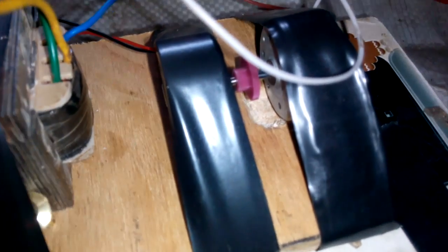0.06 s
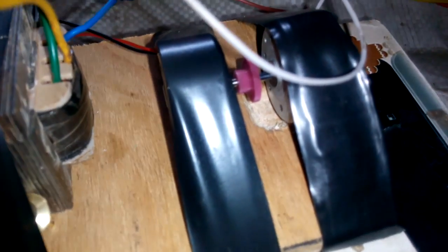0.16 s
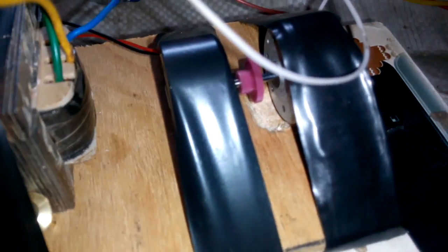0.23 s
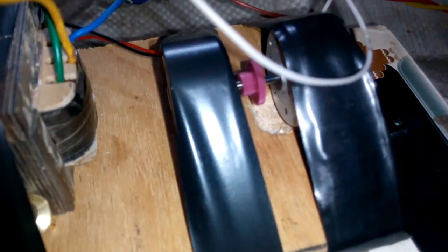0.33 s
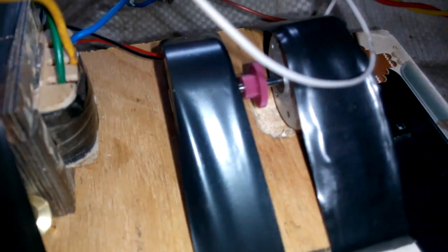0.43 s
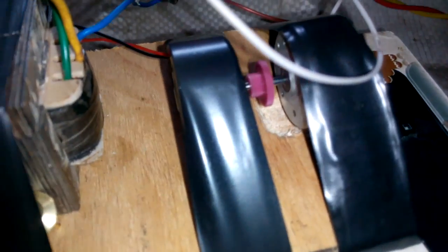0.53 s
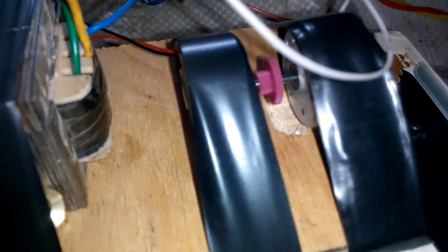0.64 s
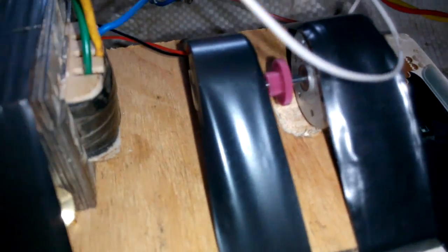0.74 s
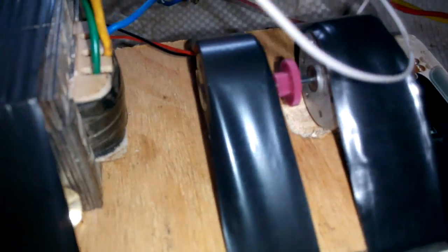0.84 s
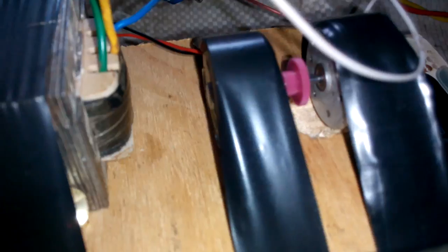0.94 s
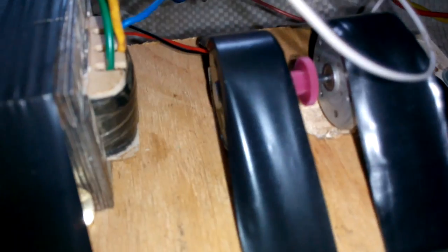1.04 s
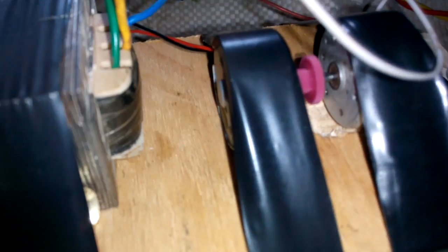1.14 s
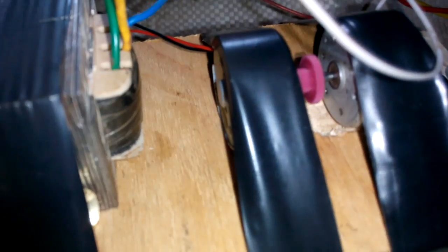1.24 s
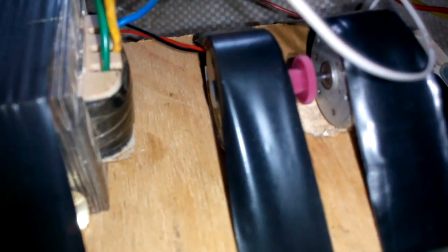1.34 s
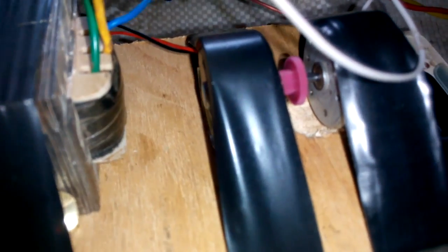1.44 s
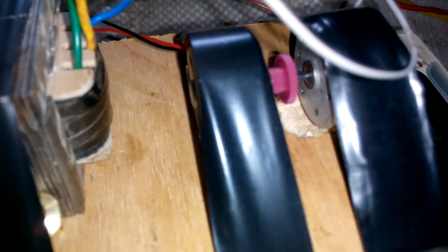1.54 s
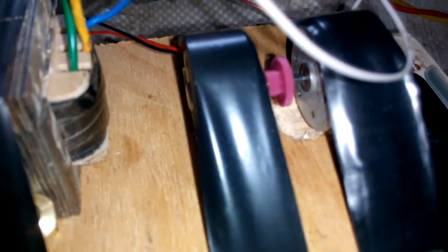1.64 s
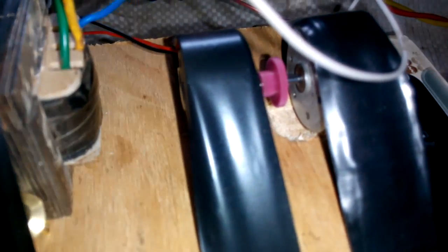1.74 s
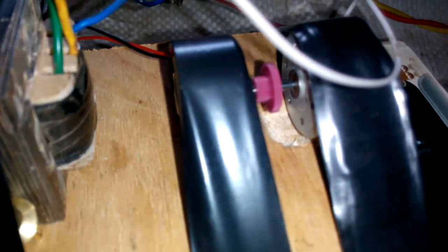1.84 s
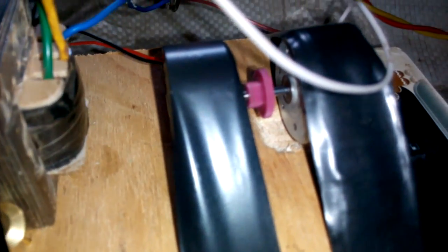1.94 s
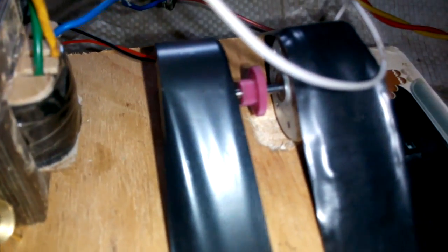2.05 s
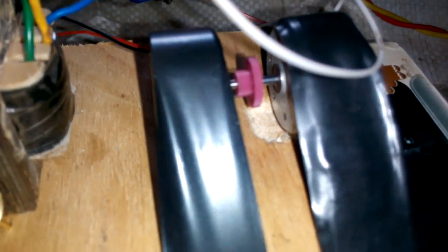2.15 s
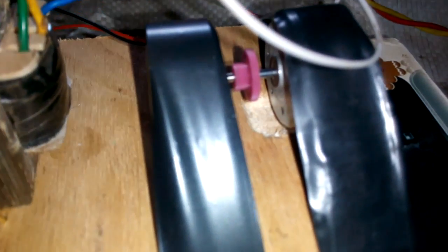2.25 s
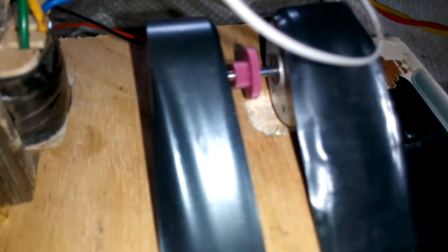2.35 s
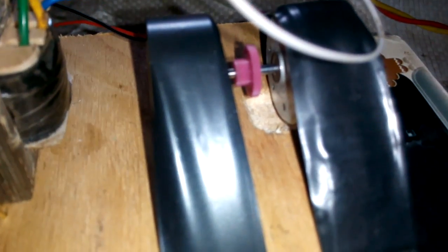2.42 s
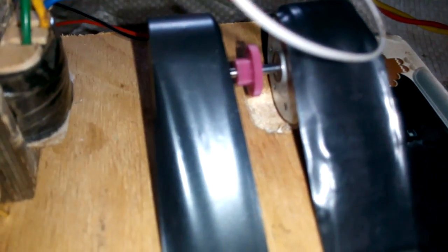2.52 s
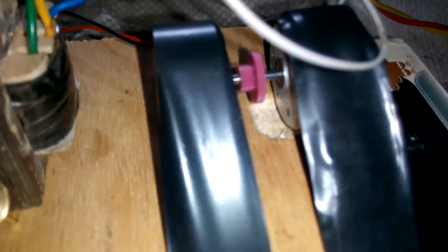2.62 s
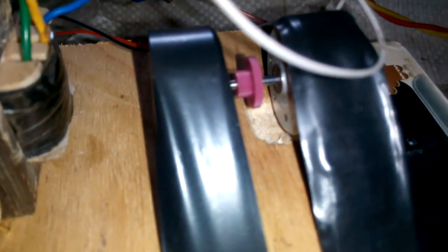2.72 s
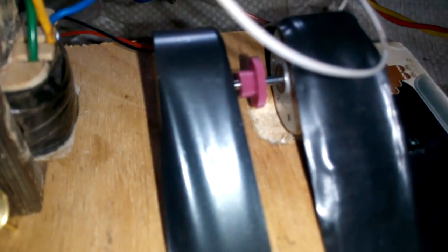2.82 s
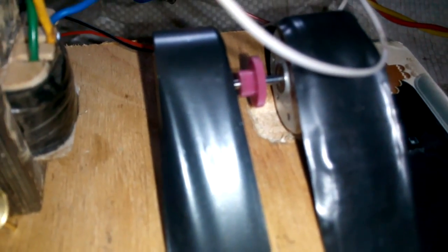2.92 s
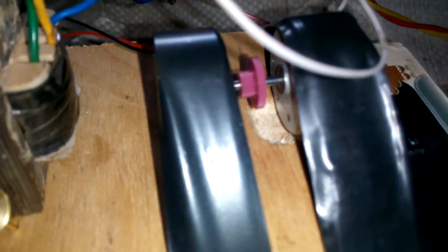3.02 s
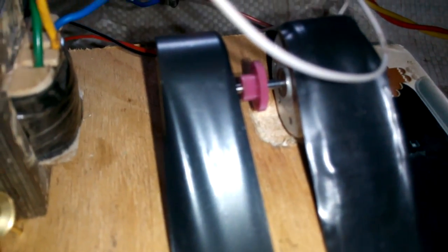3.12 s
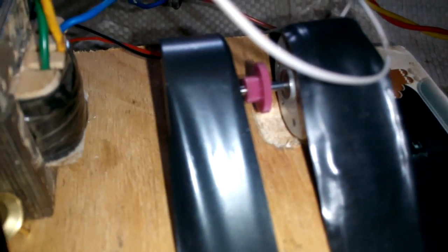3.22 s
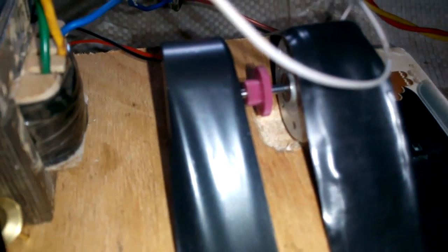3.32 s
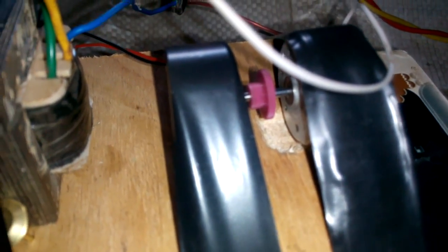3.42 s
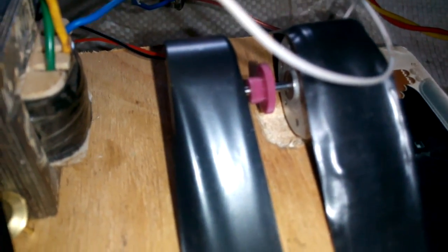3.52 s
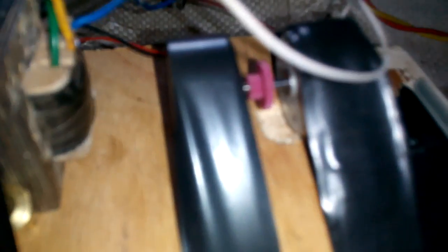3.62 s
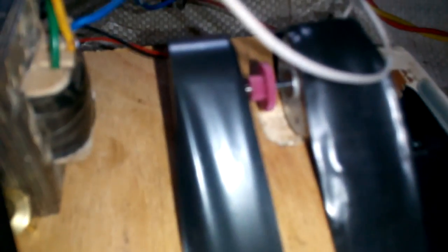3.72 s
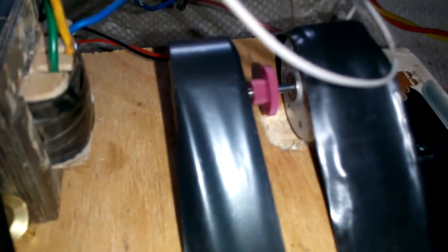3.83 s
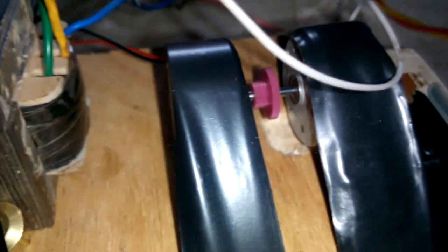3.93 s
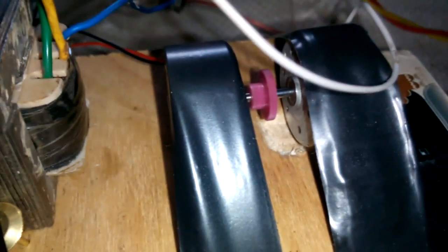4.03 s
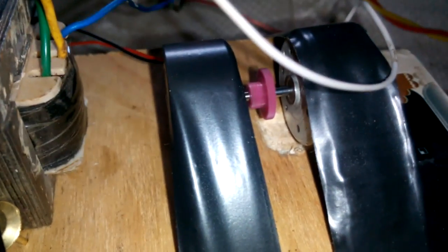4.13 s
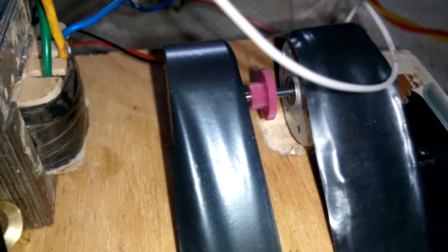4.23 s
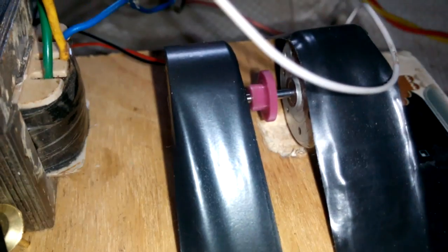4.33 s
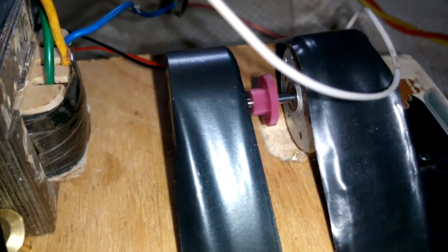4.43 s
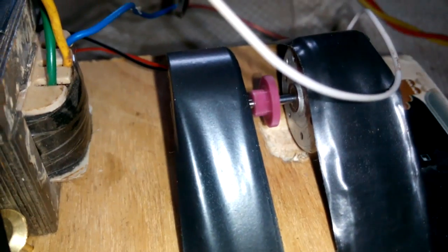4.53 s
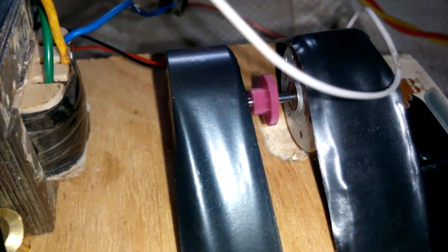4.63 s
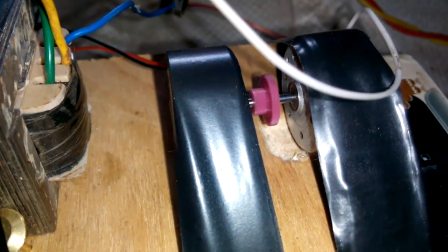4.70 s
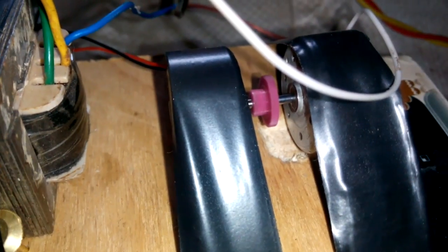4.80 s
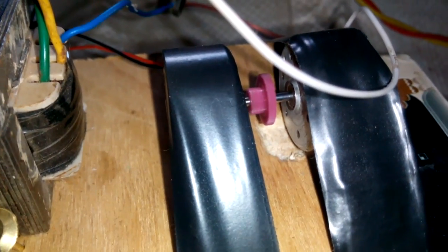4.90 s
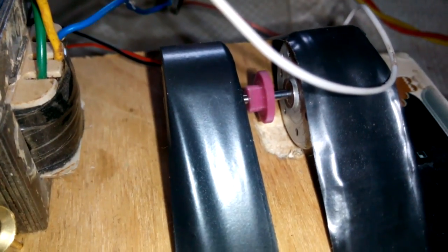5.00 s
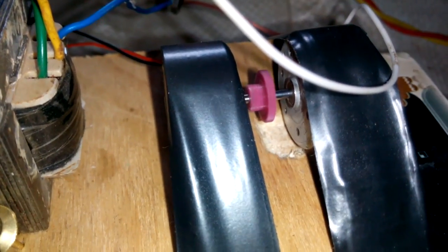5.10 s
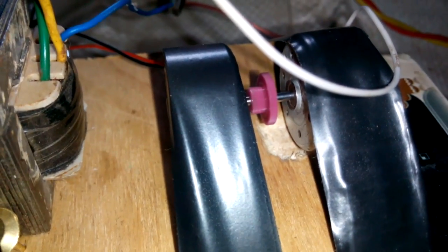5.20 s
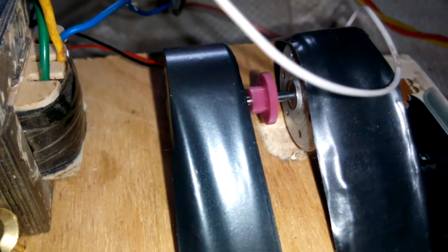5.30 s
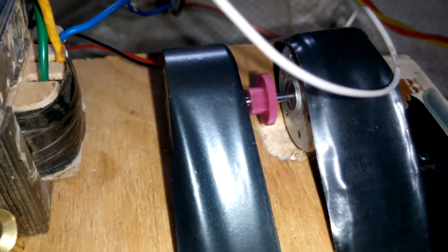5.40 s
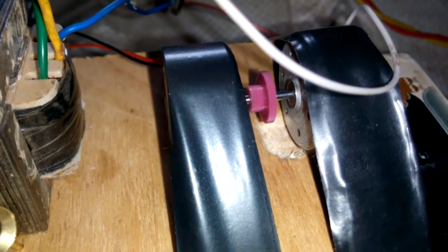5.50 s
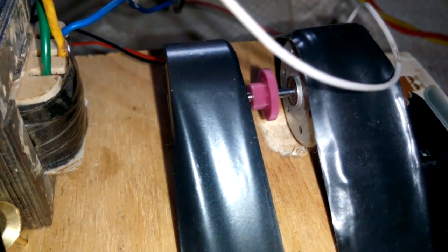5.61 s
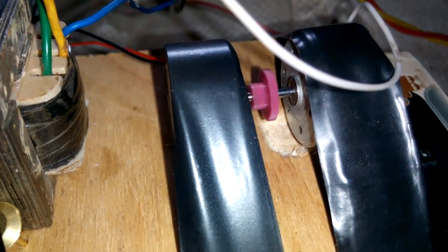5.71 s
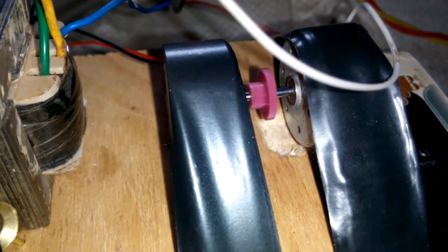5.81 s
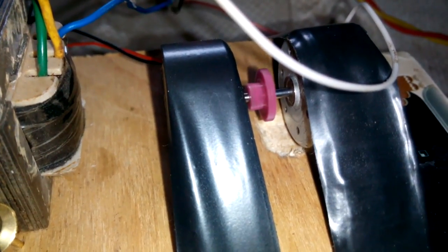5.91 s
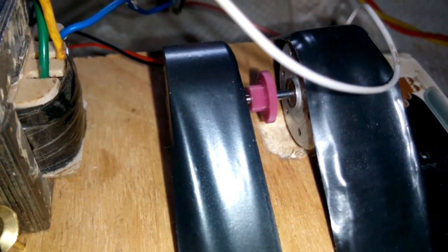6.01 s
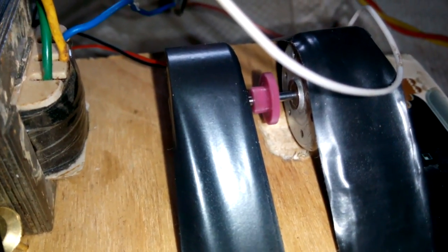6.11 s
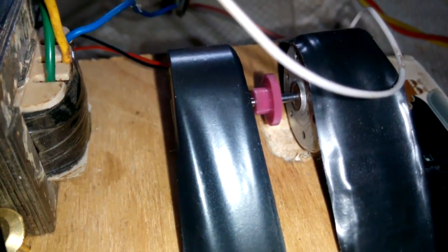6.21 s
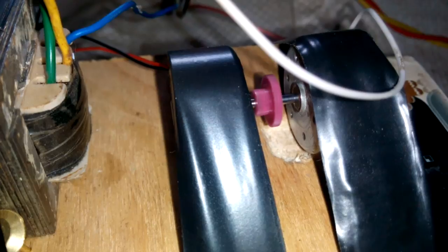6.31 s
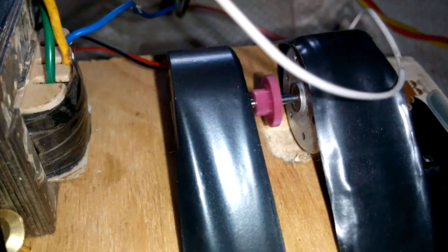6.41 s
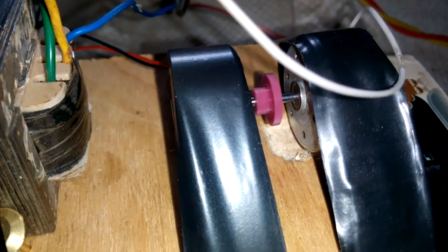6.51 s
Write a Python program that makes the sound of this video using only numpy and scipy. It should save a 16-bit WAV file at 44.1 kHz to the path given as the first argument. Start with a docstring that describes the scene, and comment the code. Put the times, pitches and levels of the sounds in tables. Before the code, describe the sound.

A steady motor whine on a wooden board glides downward, breaking into rattle, dry snaps and slow bearing ticks over faint hiss.

```python
"""On a plywood board in a quiet room, two small DC motors taped shaft to shaft whine and beat against each other.
The driven one slows to a crawl while the other coasts down, and the whine sinks into a rumble of the board.
Tones are sines locked to shaft angle; rumble, rattle and hiss are shaft-driven noise through resonances.
Ticks of loose bearings, snaps, clacks and knocks are impulses or bursts that ring; moans are short rising sines."""
import sys
import numpy as np
from scipy import signal
from scipy.fft import rfft, irfft, next_fast_len
from scipy.io import wavfile
from scipy.ndimage import uniform_filter1d

SR = 44100
rng = np.random.default_rng(int(sys.argv[2]) if len(sys.argv) > 2 else 0)


def generate_wav(sig):
    """Save sig (samples, or channels by samples) to the path in sys.argv[1] as 16-bit PCM at SR."""
    pcm = np.round(np.clip(np.atleast_2d(sig).T, -1, 1) * 32767).astype(np.int16)
    wavfile.write(sys.argv[1], SR, pcm)


N = 288899

# Speed of the driven and of the coasting motor: (time [s], speed [turns/s])
DRIVE = [(0, 120.74), (0.55, 120.0), (1, 120.35), (1.42, 118.03), (1.75, 112.12), (2, 103.73),
         (2.25, 90.39), (2.65, 64.57), (2.9, 52.18), (3.2, 42.49), (3.5, 35.21), (4, 28.61), (4.45, 24.04),
         (5.1, 22.94), (6, 20.03), (6.55, 19.04)]
COAST = [(0, 118.79), (1.1, 118.22), (1.65, 115.65), (2.1, 107.78), (2.7, 86.84), (3.25, 74.25),
         (3.6, 63.12), (4.1, 51.17), (4.6, 41.96), (5.3, 35.26), (6.55, 30.86)]
# Strong tones of torque ripple: (order of the driven shaft [1], multiple of the slip added [1],
# lag of the beat [turns of slip], relative level [dB])
WHINE = [(1, 0, 0, -26), (1, 1, 0.11, -5.5), (2, 0, 0, -18.5), (2, 2, -0.084, -29), (4, 0, 0, -26.5),
         (5, 1, .81, -38), (5, 3, 0, -48), (5, 5, .04, -49), (6, 0, 0, -25.5), (7, -1, -0.024, -42),
         (7, 1, -0.043, -40.5), (8, 0, 0, -42), (12, 0, 0, -40.5), (12, 2, .3, -42.5)]
# Weaker tones of imbalance and commutator: (order [1], relative level [dB])
BUZZ = [(3, -53), (9, -57), (10, -58), (11, -57), (13, -75), (14, -57.5), (15, -61), (16, -54), (17, -59.5),
        (18, -62), (19, -56), (20, -61), (21, -66), (24, -67), (25, -60), (26, -62.5), (28, -60),
        (29, -60.5), (32, -60), (33, -56.5), (34, -57), (36, -67), (38, -74), (42, -60), (44, -59),
        (46, -57.5), (48, -57.5)]
# High commutator whistles: (order [1], relative level [dB])
WHISTLES = [(44, -3), (46, -3), (48, -1), (60, -.5), (70, -3), (72, -1.5), (84, -4), (86, -3), (96, -6),
            (100, -7), (106, -4), (108, -3), (110, -5), (112, -7), (118, -4), (120, 0), (126, -1),
            (132, -5), (144, -6), (156, -6)]
# Radiation of the whistles by the brush gear: (frequency [Hz], gain [dB])
BRUSH_GEAR = [(3500, -14), (4200, -1), (4500, 0), (4950, -13), (5400, -2), (6300, 1), (6900, -7),
              (8300, -5), (8800, -10), (9900, -6), (11200, -13), (12500, -5), (13400, -12), (14600, -8),
              (15500, -11), (17000, -60)]
# Radiation of the gliding whine by the taped mounting: (frequency [Hz], gain [dB])
MOUNTING = [(80, -63), (150, -38), (195, -29), (235, -28.5), (300, -21), (400, -16), (485, -1), (600, -1.5),
            (720, -4.5), (840, -6.5), (1020, -18), (1290, -28), (1400, -0.5), (1500, -10)]
# Resonances of motor cans, brush springs and bearing cap: (frequency [Hz], width [Hz], relative level [dB])
CAN_MODES = [(1412, 37.5, 8.5), (1804, 126, 4.5), (2270, 200, 0), (3035, 113, 4.5), (3333, 184, -1),
             (3918, 213, 5), (3960, 133, 8.5), (4275, 390, 1), (4890, 65, -3.5)]
BRUSH_MODES = [(5480, 1500, 5.5), (5800, 830, 10), (6390, 400, 7.5), (7550, 160, 5.5), (7600, 120, 6.5),
               (9240, 120, -2), (10420, 230, -7.5)]
CAP_MODES = [(1710, 1200, -6.5), (3940, 1700, -6)]
# Spectral shapes of board, brushes (two), room, shaking and blows: (frequency [Hz], relative level [dB])
BOARD = [(40, -30), (90, -32), (135, -18.5), (190, -19.5), (260, -9), (340, -11.5), (430, -1), (510, 4.5),
         (600, 3.5), (710, 1), (830, -7.5), (1000, -16), (1300, -18.5), (2200, -47.5), (9000, -78)]
FIZZ = [(3000, -15), (5500, 5), (7500, 4), (8100, 0), (9200, 5), (10500, 2), (11600, -2), (13000, 3),
        (14200, 3), (15500, 1)]
SCRATCH = [(3000, -15), (5500, 2), (7500, 4), (8100, 0), (9200, 5), (10500, 0), (11600, -8), (13000, -11),
           (15500, -15)]
ROOM = [(8, -49), (22, -28), (45, -32), (70, -9.5), (130, 1), (190, -2), (300, 1), (1000, -10), (4000, -40),
        (9000, -31), (12000, -57), (15500, -53)]
TREMOR = [(15, -9), (27, 1), (48, -3), (75, -7), (110, 7.5), (155, 1.5), (220, 4.5), (400, -28.5)]
SNAP = [(200, -33), (700, 7), (1500, 19), (2600, -5), (4500, 15.5), (6500, 12.5), (8800, 14), (10200, -5),
        (12000, -18), (16000, -62)]
CLACK = [(150, -15), (600, 16), (1200, 7), (1700, 8.5), (2600, -6), (4400, 3.5), (6500, -11), (9000, -11),
         (12000, -47), (16000, -44)]
KNOCK = [(30, -22), (70, -3), (150, 10), (240, 16), (340, 9), (470, 7), (590, 16), (700, 3), (1000, -1),
         (1500, -4), (3000, -15), (6000, -21), (16000, -57)]
# Sharp snaps, duller clacks of the mounting, knocks on the board: (time [s], peak level [dB])
SNAPS = [(1.673, -24.5), (2.950, -22), (3.7421, -19.5), (3.7531, -27), (3.7731, -17.5), (3.776, -28)]
CLACKS = [(4.0949, -15.5), (4.1117, -16.5), (4.1181, -22)]
KNOCKS = [(1.895, -32), (2.965, -31), (3.4175, -14.5)]
# Ticks of the slowing shaft in its bearing: (time [s], peak level [dB])
TICKS = [(2.6468, -43), (2.6703, -33), (2.6937, -34), (2.751, -30.5), (2.786, -32), (2.8123, -30),
         (2.8441, -32), (2.8847, -33), (2.9328, -27), (2.967, -31.5), (3.0322, -29.5), (3.0958, -30.5),
         (3.187, -32), (3.1998, -31), (3.3364, -33.5), (3.3502, -37.5), (3.3636, -37), (3.378, -33),
         (3.391, -33), (3.5435, -40), (3.558, -39), (3.5727, -32), (3.6183, -34.5), (3.8191, -33.5),
         (3.835, -37), (3.853, -32.5), (4.019, -41), (4.0376, -38), (4.056, -35), (4.073, -34),
         (4.299, -35.5), (4.318, -36), (4.3388, -32.5), (4.3595, -36.5), (4.5205, -45), (4.5419, -37),
         (4.564, -32), (4.584, -37), (4.608, -39), (4.732, -35), (4.7554, -37), (4.7774, -40),
         (4.8822, -33), (4.9055, -42), (5.0126, -35.5), (5.0355, -36), (5.1212, -37), (5.144, -35),
         (5.232, -40), (5.254, -35), (5.3426, -40), (5.3668, -36.5), (5.457, -38), (5.4803, -39.5),
         (5.573, -35.5), (5.598, -39.5), (5.69, -40), (5.716, -39.5), (5.81, -40), (5.836, -40),
         (5.931, -39.5), (5.9567, -36.5), (6.0809, -35), (6.1076, -40), (6.235, -34), (6.262, -45),
         (6.364, -38.5), (6.3907, -41), (6.4902, -38), (6.517, -36)]
# Bumps of the swinging rotors, ringing in the board: (time [s], peak level [dB])
BUMPS = [(3.12, -22.5), (3.16, -35), (3.249, -25.5), (3.634, -23), (3.709, -32), (3.87, -23.5),
         (4.131, -26), (4.208, -32), (4.254, -30.5), (4.381, -25), (4.529, -29), (4.609, -32),
         (4.778, -27.5), (6.109, -32), (6.298, -31)]
# Howls of the loose shaft: (order [1], speed at the peak [turns/s], width [turns/s], mean level [dB])
HOWLS = [(12, 53.5, 5.5, -37), (13.6, 47.9, 6.5, -35.5)]
# Rising moans of the board as the rotors swing into step: (start [s], length [s], mid pitch [Hz],
# rise [Hz], level at the top of the swell [dB])
MOANS = [(4.575, 0.095, 545, 59.7, -45), (4.765, .08, 535, 60, -42.5), (4.905, 0.077, 520, 60.6, -47.5),
         (5.025, 0.074, 540, 49.6, -45.5), (5.145, .09, 530, 40, -44.5), (5.255, 0.081, 528, 40, -44),
         (5.365, .11, 522, 40, -42), (5.48, .11, 514, 35.7, -42.5), (5.595, 0.083, 505, 32, -41.5),
         (5.715, 0.112, 500, 30, -44), (5.84, 0.09, 490, 28.2, -44), (5.99, 0.097, 500, 92, -44.5),
         (6.02, .13, 1035, 35, -56.5), (6.05, 0.175, 690, 40, -50.5)]

# Speed laws: (relative level when fast [dB], knee [turns/s], loss per halving of speed below it [dB])
WHINE_LAW, BUZZ_LAW, WHISTLE_LAW = (0, 55, 3.9), (0, 119, 45), (-60, 104, 14)
RUMBLE_LAW, RATTLE_LAW = (-35.5, 76, 5.1), (-41.5, 117.6, 8.64)
HISS_LAW, FIZZ_LAW, SHAKE_LAW = (-50.5, 93, 2.64), (-55, 109, 11), (-57, 109, 18)

FULL_SPEED = 120  # turns/s
INERTIA_S = .2  # smoothing of the speeds
IN_STEP_S = 0.235  # a moment at which the two rotors line up
BEAT_DB, BEAT_LAG = 0.87, 0.14  # strength of the whine's swell; its lag [turns of slip]
LOOSE_S, LOOSE_RISE_S = 1.66, 0.059  # the shaft starts to run loose; rise time of every such change
LOOSE_BUZZ_LOSS_DB = 16
WHISTLE_JITTER, LOOSE_JITTER = .0005, .0016  # shaft unsteadiness: seated, and added when loose [turns]
TICKING_S, TICKING_RATTLE_DB = 2.6, -1.5  # from here separate ticks take over from the rattle
CRAWL_S, CRAWL_RATTLE_DB, CRAWL_RUMBLE_DB = 4.17, -2, -0.94  # from here rattle and rumble are weaker
PLAY_SHARE, CRAWL_PLAY_SHARE = 0.59, .15  # share of bearing chatter in the loose rattle, before and in the crawl
SEATED_RASP_SHARE = .24  # share of the seated rattle that repeats on every turn
SEATED_RATTLE_DB, RATTLE_BEAT_DB = -1, 0.5  # the seated rattle is weaker and swells with the beat
REPEAT_SHARE, REPEAT_POWER = 0.82, 0.46  # repeating share of the scrape at full speed; its power of speed
BALANCED_DB, ROUGH_BELOW = -13, 105.3  # cut in rumble at full speed; speed at which it is gone [turns/s]
CRITICAL_SPEED, CRITICAL_WIDTH = 81.4, 4.3  # the coasting rotor shakes the board hardest here [turns/s]
CRITICAL_RUMBLE_DB, CRITICAL_RATTLE_DB = 1, 1.5
SWING_LEAD = 0.3  # lead of the coasting rotor's wobble over its knock [turns]
THUD_SHARE = .2  # share of clean thuds in the board's drive while the shaft is loose, before the crawl
HISS_ONSET_S, HISS_RISE_S, HISS_QUIET_DB = 0.68, 0.33, -8  # start and length of the hiss's rise from quiet
RUB_S, RUB_WIDTH_S, RUB_DB = 0.45, 0.18, -46  # soft rub: middle, Gaussian half width, peak level
TICK_CHATTER_S, TICK_CUT_HZ, WEAK_TICK_DB = 0.00066, 4600, -8.5  # decay; low-pass; soft ticks re neighbours
CRACKLE_S, CRACKLE_LENGTH_S, CRACKLE_DB, CRACKLE_FALL_DB = 3.781, 0.028, -20.5, 9
ROOM_DB, CUTOFF_HZ = -55.5, 15550


def from_db(db):
    return 10 ** (np.asarray(db) / 20)


def rms_one(x):
    return x / np.sqrt(np.mean(x ** 2) + 1e-20)


def noise():
    return rng.standard_normal(N)


def wander(rate_hz):
    """Random modulation: chance values joined by straight lines, scaled to rms 1."""
    knots = rng.standard_normal(int(N / SR * rate_hz) + 2)
    return rms_one(np.interp(np.arange(N) / SR * rate_hz, np.arange(len(knots)), knots))


def ramp(start_s, length_s):
    """Linear transition from 0 at the start to 1 once the length has passed."""
    return np.clip((np.arange(N) / SR - start_s) / length_s, 0, 1)


def evened(x):
    """Level normalisation over a sliding quarter second, which leaves only fast detail."""
    return x / np.sqrt(np.maximum(uniform_filter1d(x ** 2, size=SR // 4), 1e-12))


def blend(a, b, share):
    """Addition of power: an equal-power mix with the given share of a."""
    share = np.clip(share, 0, 1)
    return np.sqrt(share) * evened(a) + np.sqrt(1 - share) * evened(b)


def low_pass(x, hz):
    return signal.sosfilt(signal.butter(4, hz, fs=SR, output="sos"), x)


def coloured(x, spectrum):
    """Minimum-phase filtering: the cepstrum folded to positive time gives a causal response."""
    size = 2 * next_fast_len(N // 2 + SR // 8)
    hz, db = np.transpose(spectrum)
    bins_hz = np.arange(size // 2 + 1) * SR / size
    log_gain = np.log(from_db(np.interp(np.log(bins_hz + 1), np.log(hz), db)))
    cepstrum = irfft(log_gain)[:size // 2]
    cepstrum[1:] *= 2
    return irfft(rfft(x, size) * np.exp(rfft(cepstrum, size)))[:N]


def resonate(x, modes):
    """Modal superposition: parallel two-pole resonances with alternating signs."""
    out = 0
    for k, (hz, width, db) in enumerate(modes):
        r = np.exp(-np.pi * width / SR)
        gain = (-1) ** k * from_db(db) * (1 - r * r) / 2
        poles = [1, -2 * r * np.cos(2 * np.pi * hz / SR), r * r]
        out = out + gain * signal.lfilter([1, 0, -1], poles, x)
    return out


def tone(turns, order):
    """Order tracking: a sine of rms 1 locked to the shaft angle."""
    return np.sqrt(2) * np.sin(2 * np.pi * (order * turns + rng.random()))


def speed_of(rows):
    """Rotational inertia: a speed curve in turns per second, rounded by a moving average."""
    s, turns_per_s = np.transpose(rows)
    speed = np.interp(np.arange(N) / SR, s, turns_per_s)
    return uniform_filter1d(speed, size=int(INERTIA_S * SR), mode="nearest")


def level_at(speed, law):
    """Power law of speed: constant dB above a knee, a fixed loss for every halving below it."""
    db, knee, loss_db = law
    return db + loss_db * np.minimum(np.log2(speed / knee), 0)


def scrape(turns, count, even_db, spread_db):
    """Periodic roughness: one profile recurs every turn; even orders are stressed by the two magnets."""
    orders = np.arange(count)
    lines_db = even_db * (orders % 2 == 0) + spread_db * rng.standard_normal(count)
    lines = from_db(lines_db) * np.exp(2j * np.pi * rng.random(count))
    kept = (orders > 0) & ~np.isin(orders, (4, 5, 6, 7, 12))  # leaves these orders to the whine
    profile = irfft(lines * kept, 8192)
    return rms_one(np.interp(turns % 1, np.arange(len(profile)) / len(profile), profile))


def hits(events, spectrum):
    """Impulse response: each blow excites the same coloured response, scaled to its peak level."""
    response = coloured(signal.unit_impulse(N), spectrum)[:SR // 10]
    clicks = np.zeros(N)
    for s, db in events:
        clicks[round(s * SR)] = from_db(db)
    return signal.oaconvolve(clicks, response / np.abs(response).max())[:N]


def room():
    """Steady background: stationary noise with the room's spectrum."""
    return from_db(ROOM_DB) * rms_one(coloured(noise(), ROOM))


def whine(drive, slip, speed):
    """Torque ripple and beating: tones glide through the mounting's response; slip adds sidebands and a swell."""
    angles = rng.random(size=32)
    hz, mounting_db = np.transpose(MOUNTING)
    strong = 0
    for order, slips, lag, db in WHINE:
        radiated_db = np.interp(np.log(order * speed), np.log(hz), mounting_db)
        turns = order * drive + slips * (slip + lag) + angles[order]
        strong = strong + from_db(db + radiated_db) * np.sqrt(2) * np.sin(2 * np.pi * turns)
    beat = 4 * np.pi * (slip + BEAT_LAG)
    swell_db = BEAT_DB * (np.cos(beat) + np.cos(2 * beat))
    return from_db(level_at(speed, WHINE_LAW) + swell_db) * strong


def buzz(drive, coast, slip, speed, loose):
    """Interference of close tones from both shafts; orders below 40 weaken once the shaft runs loose."""
    out = 0
    for order, db in BUZZ:
        sideband = tone(order * drive + 2 * slip, 1)
        beating = tone(drive, order) + .55 * sideband + .3 * tone(coast, order)
        loss_db = LOOSE_BUZZ_LOSS_DB * loose * (order < 40)
        out = out + from_db(db - 2.5 + 2.5 * wander(12) - loss_db) * beating
    return from_db(level_at(speed, BUZZ_LAW)) * out


def whistles(turns, speed, loose):
    """Selective radiation: high shaft orders light up as they slide through the brush gear's resonances."""
    hz, gear_db = np.transpose(BRUSH_GEAR)
    out = 0
    for order, db in WHISTLES:
        radiated_db = np.interp(order * speed, hz, gear_db)
        flicker_db = (1.5 + 2 * loose) * wander(14)
        out = out + from_db(db + radiated_db + flicker_db) * tone(turns, order)
    return from_db(level_at(speed, WHISTLE_LAW)) * out


def cycle_knocks(turns, other, beat_db, spread_db):
    """Periodic impact: one impulse a cycle, hardest when the other rotor swings the same way."""
    at = np.flatnonzero(np.diff(np.floor(turns)))
    out = np.zeros(N)
    out[at] = from_db(beat_db * np.cos(2 * np.pi * other[at]) + spread_db * rng.standard_normal(len(at)))
    return out


def bearings(drive, coast, coast_speed):
    """Impact in bearing play: both shafts knock, the coasting one less as it slows."""
    swing = np.minimum(coast_speed / 70, 1.2) ** 2
    driven = cycle_knocks(2 * drive, coast + SWING_LEAD, beat_db=5, spread_db=1)
    coasting = cycle_knocks(coast, 2 * drive, beat_db=2, spread_db=1)
    return driven + 1.1 * swing * coasting


def chattering(knocks):
    """Repeated contact: each knock decays over a millisecond with random sign."""
    decay = np.exp(-1 / (.001 * SR))
    return signal.lfilter([1], [1, -decay], knocks + 1e-18) * np.sign(noise())


def rumble(drive, coast, speed, coast_speed, knocks, chatter, repeating, critical, loose, crawling):
    """Forced vibration of the board by knocks, chatter and rubbing, strongest near the critical speed."""
    balanced = np.clip((speed - ROUGH_BELOW) / (FULL_SPEED - ROUGH_BELOW), 0, 1)
    level_db = (level_at(coast_speed, RUMBLE_LAW) + BALANCED_DB * balanced
                + CRITICAL_RUMBLE_DB * critical + CRAWL_RUMBLE_DB * crawling)
    # with falling speed the board throbs more with every turn and as the rotors swing in and out of step
    in_step = np.cos(2 * np.pi * (2 * drive - coast))
    throb_db = (1 - repeating) * (in_step + 2.2 * np.cos(2 * np.pi * drive))
    scrapes = (scrape(drive, count=60, even_db=4, spread_db=2)
               + scrape(coast, count=40, even_db=1, spread_db=2))
    rubbing = blend(scrapes, noise(), .3 - .18 * crawling)
    board_drive = blend(knocks, blend(chatter, rubbing, .08), THUD_SHARE * (loose - crawling))
    return from_db(level_db) * evened(coloured(from_db(throb_db) * board_drive, BOARD))


def rasp(drive, slip):
    """Phase-dependent contact: two scrapes trade places as the rotors slip past each other."""
    one, other = (scrape(drive, count=50, even_db=0, spread_db=1) for _ in range(2))
    return one * np.cos(2 * np.pi * slip) + other * np.sin(2 * np.pi * slip)


def rattle(drive, slip, coast_speed, chatter, critical, loose, ticking, crawling):
    """Resonance of the motor cans, driven by rasp, bearing chatter and noise."""
    play_share = PLAY_SHARE + (CRAWL_PLAY_SHARE - PLAY_SHARE) * crawling
    can_drive = blend(rasp(drive, slip), blend(chatter, noise(), play_share), SEATED_RASP_SHARE * (1 - loose))
    seated_db = SEATED_RATTLE_DB + RATTLE_BEAT_DB * np.cos(4 * np.pi * slip)
    level_db = (level_at(coast_speed, RATTLE_LAW) + CRITICAL_RATTLE_DB * critical + seated_db * (1 - loose)
                + TICKING_RATTLE_DB * (ticking - crawling) + CRAWL_RATTLE_DB * crawling)
    return from_db(level_db) * evened(low_pass(resonate(can_drive, CAN_MODES), hz=5260))


def hiss(coast_speed, brushes, chatter, repeating):
    """Friction-driven resonance of the brush springs, from scrape, chatter and noise."""
    spring_drive = blend(brushes, blend(chatter, noise(), .06), .85 * repeating)
    ringing = resonate(spring_drive, BRUSH_MODES)
    for _ in range(2):
        ringing = low_pass(ringing, hz=10600)
    onset_db = HISS_QUIET_DB * (1 - ramp(HISS_ONSET_S, HISS_RISE_S))
    return from_db(level_at(coast_speed, HISS_LAW) + onset_db - 7 * repeating) * evened(ringing)


def fizz(coast_speed, brushes, repeating):
    """Sliding friction: repeating brush scrape gives way to random scratching as the shaft slows."""
    repeated = coloured(blend(brushes, noise(), 1.1 * repeating), FIZZ)
    return from_db(level_at(coast_speed, FIZZ_LAW)) * blend(repeated, coloured(noise(), SCRATCH), repeating)


def howl(drive, speed):
    """Resonance passage: rough tones of the loose shaft swell as it slows through the board's resonance."""
    out = 0
    for order, peak_speed, width, db in HOWLS:
        swell = np.exp(-((speed - peak_speed) / width) ** 2)
        rough_turns = drive + .004 * wander(50)
        out = out + from_db(db + 2 * wander(60)) * swell * tone(rough_turns, order)
    return out


def motors(speed, coast_speed):
    """Rotating-machine excitation: two shaft angles time the tones and noises; the speeds guide their levels."""
    drive, coast = np.cumsum(speed) / SR, np.cumsum(coast_speed) / SR
    slip = coast - drive
    slip = slip - slip[int(IN_STEP_S * SR)]
    loose, ticking, crawling = (ramp(s, LOOSE_RISE_S) for s in (LOOSE_S, TICKING_S, CRAWL_S))
    repeating = np.clip(REPEAT_SHARE * (speed / FULL_SPEED) ** REPEAT_POWER, 0, 1)
    critical = np.exp(-((coast_speed - CRITICAL_SPEED) / CRITICAL_WIDTH) ** 2)
    knocks = bearings(drive, coast, coast_speed)
    chatter = chattering(knocks)
    unsteady = drive + (WHISTLE_JITTER + LOOSE_JITTER * loose) * wander(140)
    brushes = (scrape(unsteady, count=230, even_db=6, spread_db=2)
               + .3 * scrape(coast, count=230, even_db=3, spread_db=2))
    tones = whine(drive, slip, speed) + buzz(drive, coast, slip, speed, loose)
    tones = tones + whistles(unsteady, speed, loose) + howl(drive, speed)
    body = rumble(drive, coast, speed, coast_speed, knocks, chatter, repeating, critical, loose, crawling)
    body = body + rattle(drive, slip, coast_speed, chatter, critical, loose, ticking, crawling)
    return tones + body + hiss(coast_speed, brushes, chatter, repeating) + fizz(coast_speed, brushes, repeating)


def shake(coast_speed):
    """Forced low-frequency vibration of the board, dying with the speed, and one soft rub."""
    rub = from_db(RUB_DB) * np.exp(-((np.arange(N) / SR - RUB_S) / RUB_WIDTH_S) ** 2)
    return np.hypot(from_db(level_at(coast_speed, SHAKE_LAW)), rub) * rms_one(coloured(noise(), TREMOR))


def crackle(count):
    """Impulse train: uneven small snaps die away; rows (time [s], peak level [dB])."""
    along = (np.arange(count) + rng.random(count)) / count
    peaks_db = CRACKLE_DB - CRACKLE_FALL_DB * along + 2 * rng.standard_normal(count)
    return list(zip(CRACKLE_S + CRACKLE_LENGTH_S * along, peaks_db))


def snaps():
    """Impulsive excitation: sharp dry snaps, the last fraying into a crackle."""
    return hits(SNAPS + crackle(count=6), SNAP)


def board_knocks():
    """Impact on a plate: knocks with a low, woody spectrum."""
    return hits(KNOCKS, KNOCK)


def weak_ticks(speed):
    """Periodic contact: soft ticks fill the gaps, about two a turn; rows (time [s], peak level [dB])."""
    rows = []
    for (s, db), (next_s, next_db) in zip(TICKS, TICKS[1:]):
        gap_s = next_s - s
        steps = max(round(2 * gap_s * speed[int((s + next_s) / 2 * SR)]), 1)
        for k in range(1, steps):
            tick_db = (db + next_db) / 2 + WEAK_TICK_DB + 2 * rng.standard_normal()
            rows.append((s + gap_s * k / steps, tick_db))
    return rows


def slow_ticks(speed):
    """Impact and ringing: bursts of bearing chatter excite the cans and the bearing cap."""
    out, t = np.zeros(N + SR), np.arange(SR // 20) / SR
    for s, db in TICKS + weak_ticks(speed):
        burst = rng.standard_normal(len(t)) * np.exp(-t / TICK_CHATTER_S)
        ring = low_pass(resonate(burst, CAN_MODES) + resonate(burst, CAP_MODES), hz=TICK_CUT_HZ)
        start = int(s * SR)
        out[start:start + len(t)] += from_db(db) * ring / np.abs(ring).max()
    return out[:N]


def rotor_bumps():
    """Impulse response of the board to bumps of the swinging rotors."""
    return hits(BUMPS, BOARD)


def mounting_clacks():
    """Damped impact: clacks of the mounting, duller than the snaps."""
    return hits(CLACKS, CLACK)


def moans():
    """Frequency glide: short rising tones that swell quickly and fade more slowly."""
    out = np.zeros(N + SR)
    for s, length_s, hz, rise_hz, db in MOANS:
        along = np.linspace(0, 1, int(length_s * SR))
        cycles = np.cumsum(hz + rise_hz * (along - .5)) / SR
        start = int(s * SR)
        out[start:start + len(along)] += from_db(db) * np.sin(np.pi * along ** .7) * tone(cycles, 1)
    return out[:N]


def scene():
    """Superposition: motors, board and blows add in a quiet room."""
    speed, coast_speed = speed_of(DRIVE), speed_of(COAST)
    board = motors(speed, coast_speed) + shake(coast_speed) + moans()
    blows = snaps() + board_knocks() + slow_ticks(speed) + rotor_bumps() + mounting_clacks()
    return (board + blows + room())[None]


def record(dry):
    """Band limitation: a steep elliptic low-pass cuts the top."""
    return signal.sosfilt(signal.ellip(12, .1, 80, CUTOFF_HZ, fs=SR, output="sos"), dry)


dry = scene()
out = record(dry)
generate_wav(out)
```